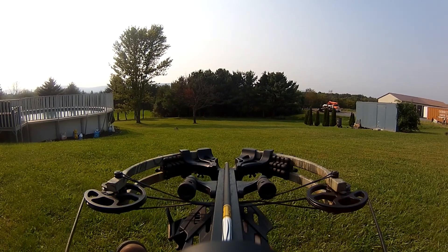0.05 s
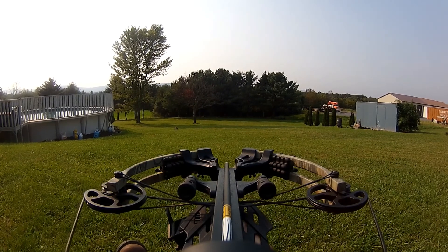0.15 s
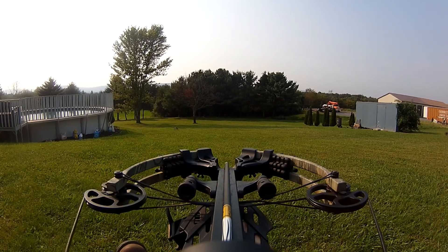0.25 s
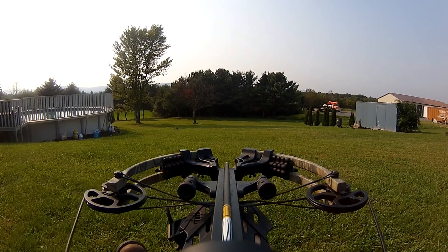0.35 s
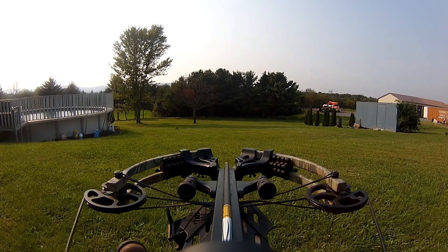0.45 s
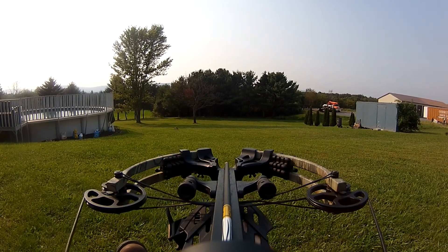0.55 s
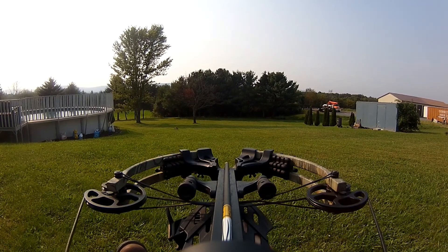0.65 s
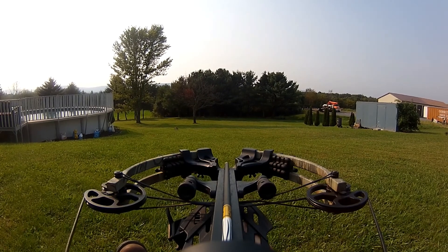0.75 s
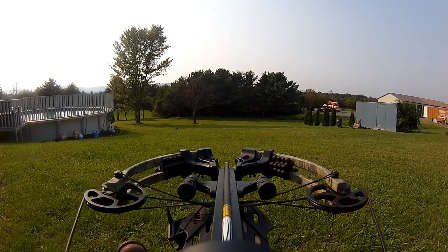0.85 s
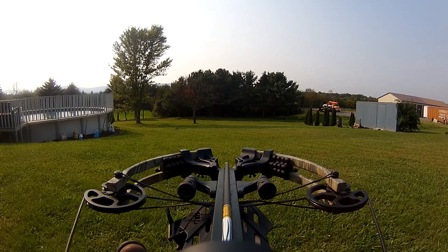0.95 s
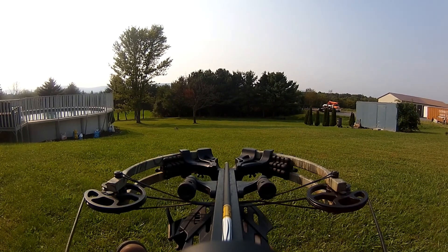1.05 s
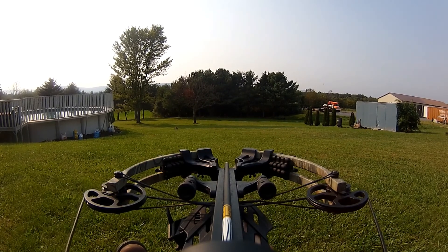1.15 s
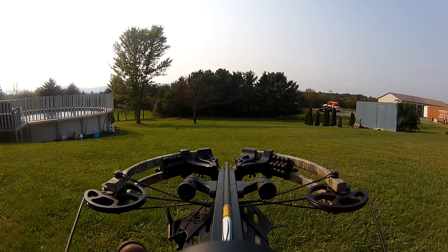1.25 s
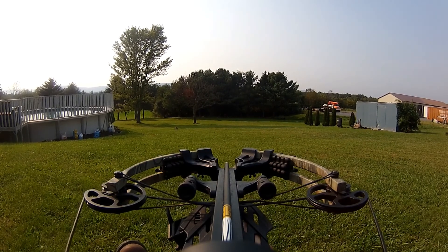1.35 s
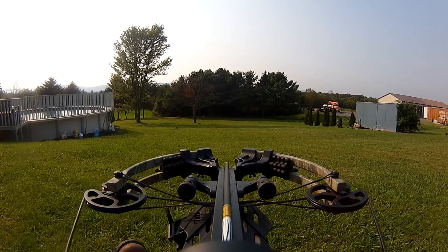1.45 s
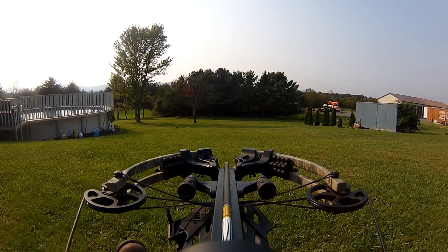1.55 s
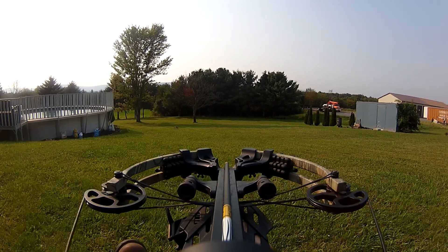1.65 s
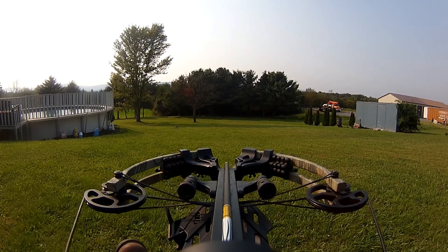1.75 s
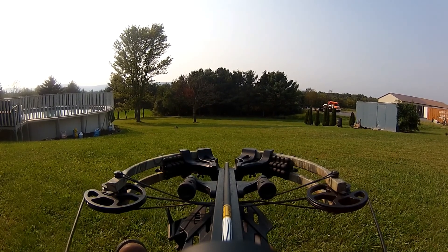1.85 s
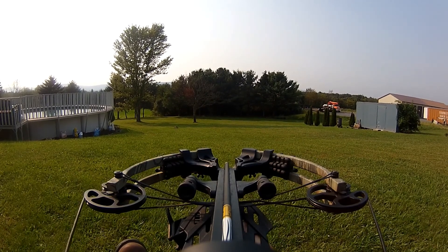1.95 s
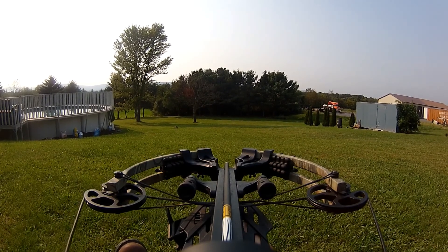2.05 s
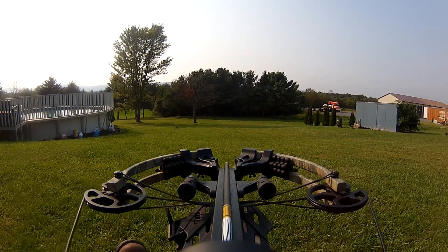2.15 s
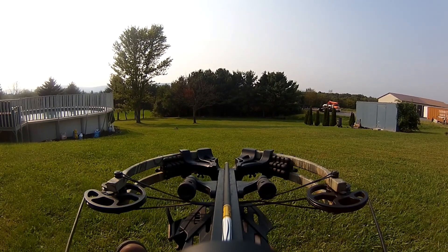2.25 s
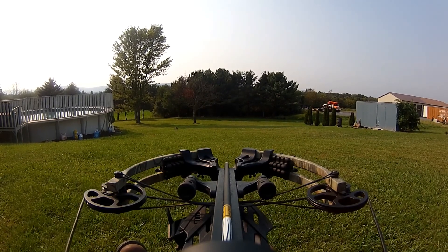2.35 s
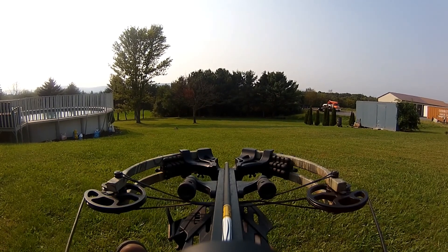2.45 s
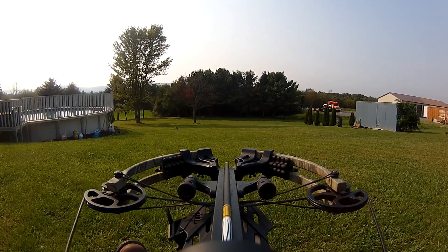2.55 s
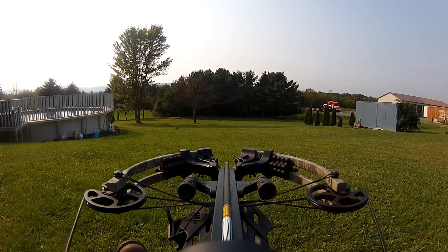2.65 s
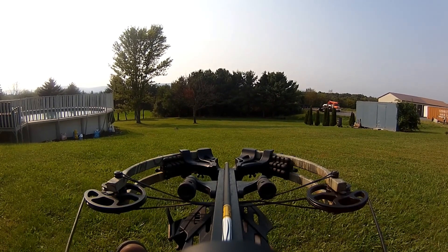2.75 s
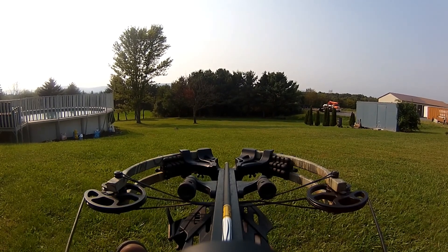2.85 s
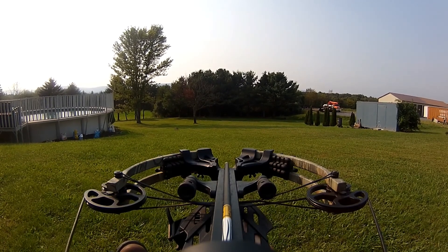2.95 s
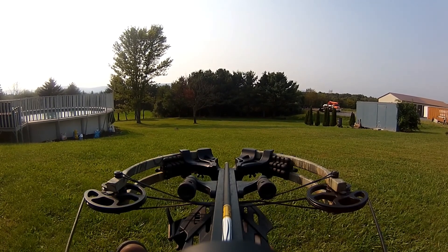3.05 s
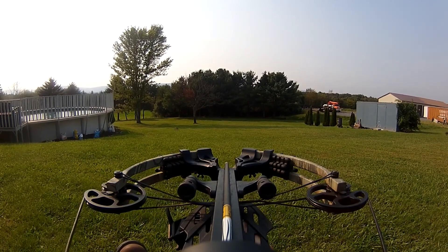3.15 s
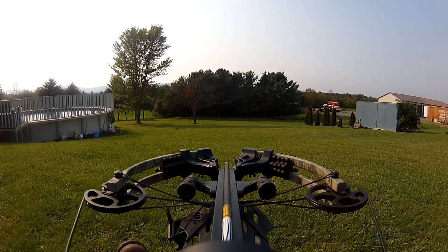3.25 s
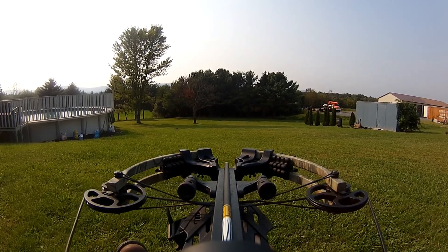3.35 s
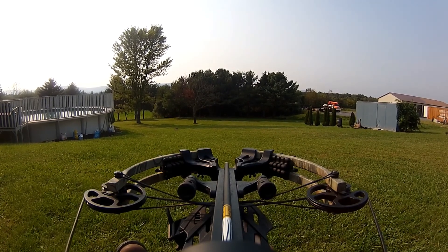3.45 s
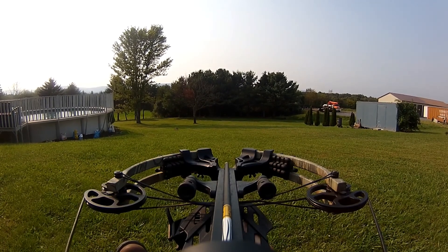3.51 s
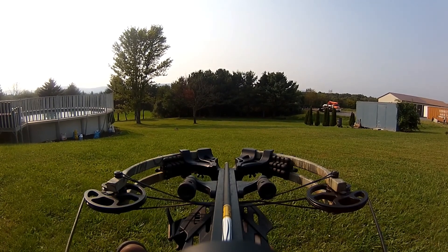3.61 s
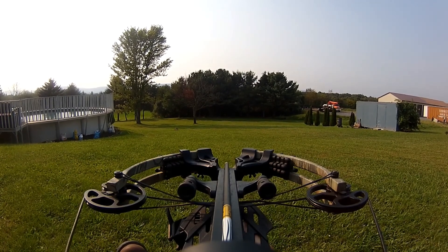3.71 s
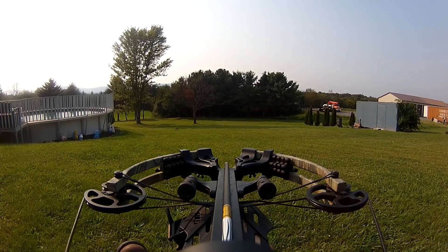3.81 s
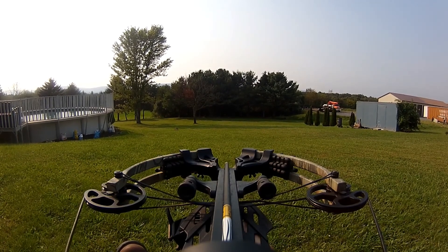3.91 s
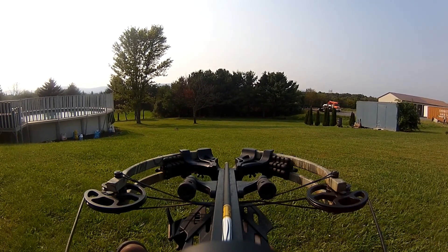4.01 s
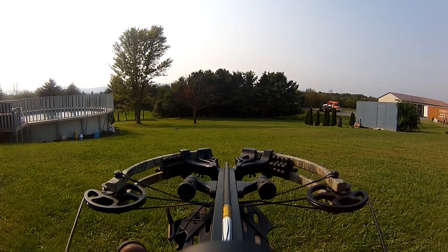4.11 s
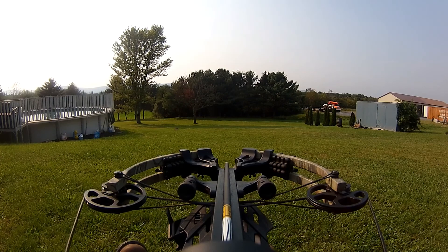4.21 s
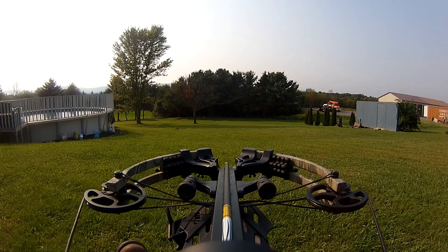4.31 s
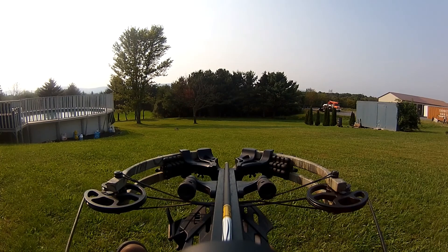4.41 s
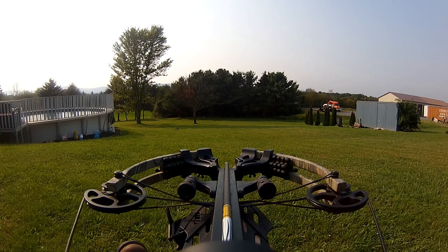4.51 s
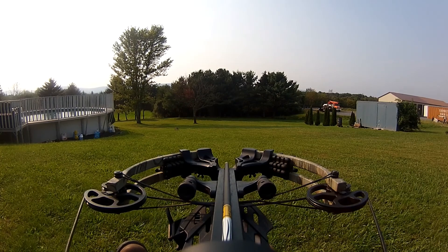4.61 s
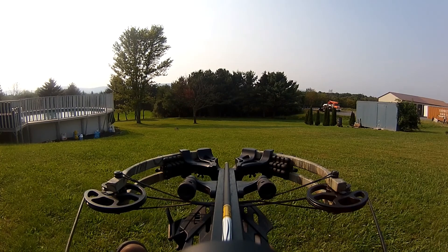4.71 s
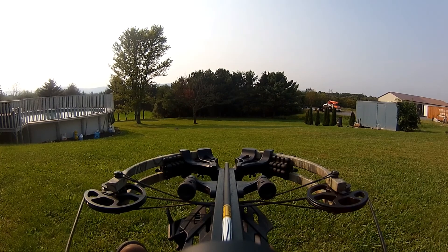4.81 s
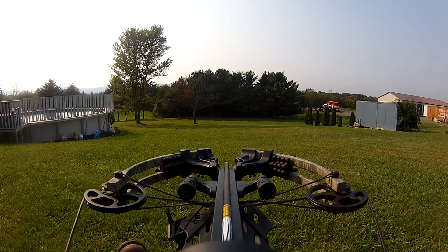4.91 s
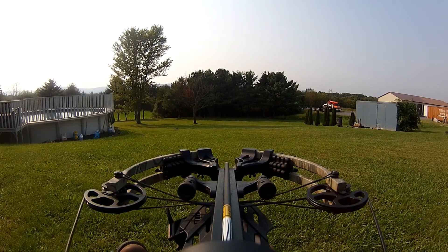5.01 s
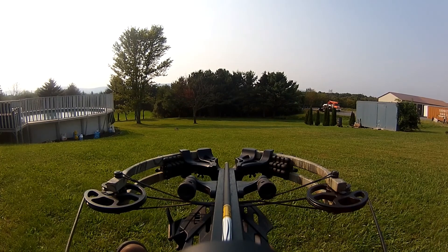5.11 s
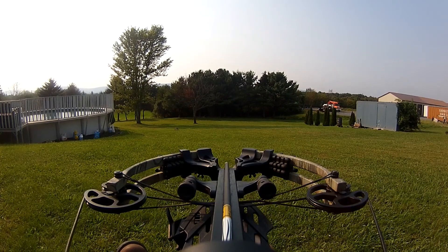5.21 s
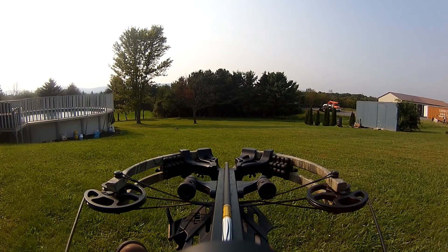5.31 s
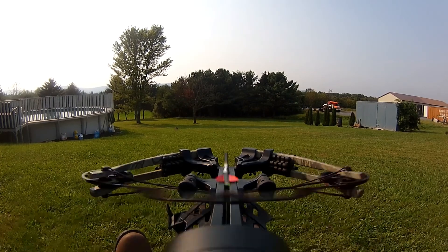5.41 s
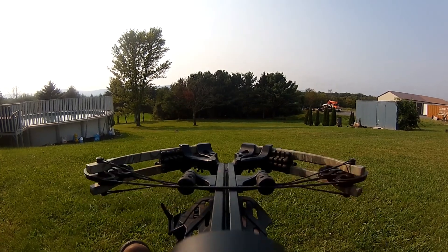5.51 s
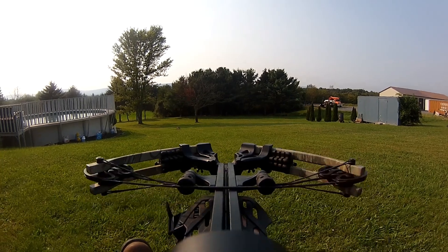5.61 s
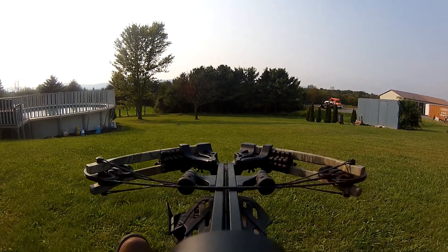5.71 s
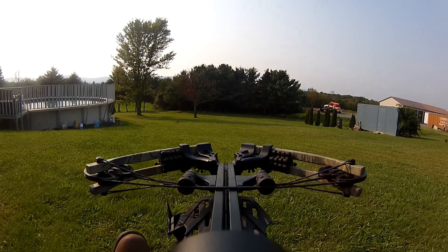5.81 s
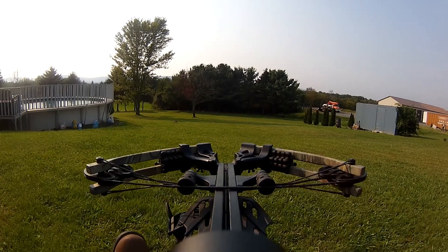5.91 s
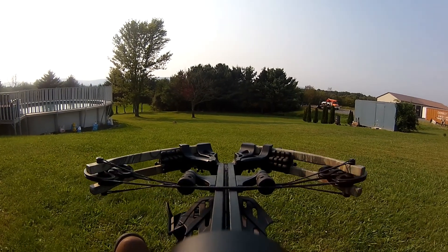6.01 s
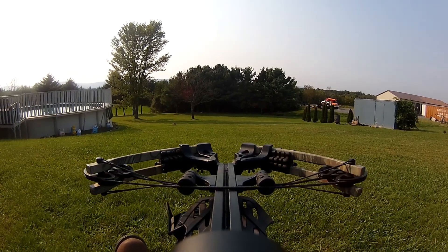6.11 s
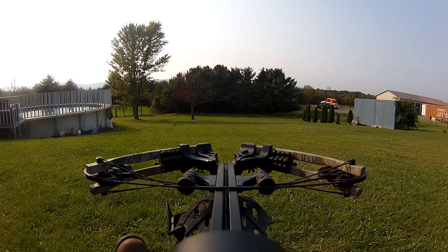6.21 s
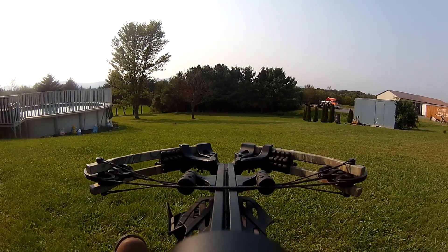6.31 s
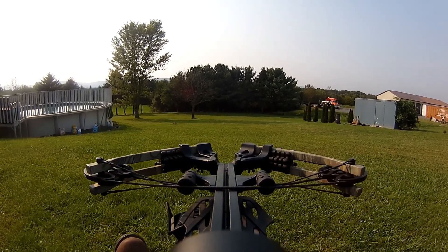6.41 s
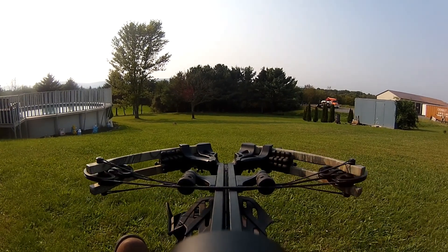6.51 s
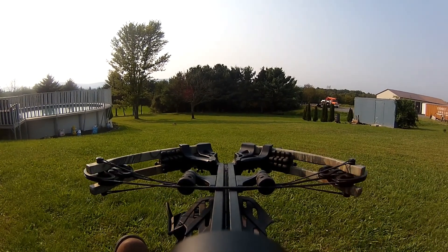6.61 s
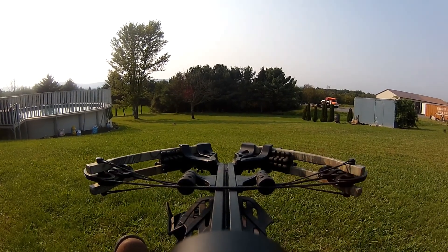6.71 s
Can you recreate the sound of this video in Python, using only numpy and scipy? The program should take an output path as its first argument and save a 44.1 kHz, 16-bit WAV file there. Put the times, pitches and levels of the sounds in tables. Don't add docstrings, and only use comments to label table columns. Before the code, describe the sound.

A small camera mounted on the crossbow hears a quiet yard: thin pulsing crickets, a brief distant bird and irregular low wind thuds. Then a tiny trigger click leads instantly into one huge, gritty, clipped crack, with string slap, ticking parts and a frame ring dying quickly. The background dips and returns, a weak far-off impact follows, and crickets and wind continue. The sound is gritty and lo-fi.

```python
import sys
import numpy as np
from scipy import signal
from scipy.fft import rfft, irfft
from scipy.io import wavfile
from scipy.ndimage import uniform_filter1d

SR = 44100
rng = np.random.default_rng(int(sys.argv[2]) if len(sys.argv) > 2 else 0)


def to_wav(s):
    ch = np.atleast_2d(s).T
    pcm = np.round(np.clip(ch, -1, 1) * 32767)
    wavfile.write(sys.argv[1], SR, pcm.astype(np.int16))


def voltage_ratio(level):
    return 10 ** (np.asarray(level, float) / 20)


N = 298116


def crossbow(stop_s=5.4065, limb_hz=106.9):
    # t/s, peak
    # level/dB, f/Hz, t60/s
    knocks = [(5.3746, -31.5, 2100, 0.0233), (5.3742, -31, 4400, 0.018), (5.3962, -2, 1480, 0.008),
              (5.3966, 0.3, 4900, .012), (5.4009, -1.5, 1900, 0.012), (5.399, -17, 67, 0.13),
              (5.404, -3, 215, 0.061), (5.401, -9, 110, .08), (5.4064, 8, 580, .018),
              (5.4082, 1.5, 700, 0.014), (5.4093, 6.5, 4480, .012), (5.4418, 3.5, 3970, 0.005),
              (5.4769, -7, 4994, .006), (5.505, -15, 5150, .006), (5.5101, -15, 3900, 0.008),
              (5.5605, -38.5, 4000, 0.0078), (5.569, -37.5, 4000, 0.0076), (5.584, -43, 4200, 0.011),
              (5.5957, -36, 2800, .012), (5.5962, -35, 1710, 0.016)]
    # f/Hz, level/dB, t60/s, swell/s while loose cables still damp them
    modes = [(107.6, 2, .33, 0.09), (150.7, -20, 0.55, .05), (212, -13, 0.3, .02), (331.5, -3, 0.24, 0.027),
             (410.8, -8, 0.66, 0.13), (820, -51.5, 1.1, .08), (917.4, -39.5, 1.49, .07),
             (1440, -43, 1.4, .055), (1786, -50.5, 1.1, .1), (2290, -39.5, 1.45, .06)]
    # first t/s, level/dB, f/Hz, fade/dB per tick, ticks
    rattles = [(5.482, 3.5, 3900, -2.5, 3), (5.5138, -10.5, 5020, -3, 4)]
    tick_t60_s = 0.0066
    out = np.zeros(N)
    ticks = []
    for s, db, hz, fade_db, count in rattles:
        ticks += [(s + k / limb_hz, db + k * fade_db, hz, tick_t60_s) for k in range(round(count))]
    for s, db, hz, t60 in knocks + ticks:
        knock = ring(db, hz, t60)
        age = np.arange(len(knock)) / len(knock)
        grit = 0.5 * rng.standard_normal(len(knock)) * voltage_ratio(db - 18 * age)
        onset = np.minimum(age / 0.07, 1)
        add(out, s, onset * (knock + grit * min(hz / 3000, 1)))
    for hz, db, t60, swell_s in modes:
        tone = ring(db, hz, t60)
        t = np.arange(len(tone)) / SR
        add(out, stop_s, tone * (1 - np.exp(-(t / swell_s) ** 4.5)))
    rush_gain, slap_gain = cables()
    swing = ((np.arange(N) / SR - stop_s) * limb_hz * 2 + 0.13 * walk(150)) % 1
    rush = level(band(rng.standard_normal(N), 4200, 5500) * voltage_ratio(1.7 * walk(700)), 0)
    pulse = 0.2 + np.exp(-swing / 0.2)
    blows = band(rng.standard_normal(N) * pulse * voltage_ratio(3.5 * walk(200)), 730, 1300)
    slap = 0.7 * band(blows, 540, 450) + 0.59 * band(blows, 1150, 450) + 0.7 * band(blows, 1950, 500)
    return out + rush_gain * rush + slap_gain * level(slap, 0)


def cables():
    lead_in_s, release_s, stopped_s, slack_s = 5.3925, 5.3963, 5.412, 5.504
    lead_in_db, rush_db, run_db = -40.5, -6.5, -13.5
    t = np.arange(N) / SR
    after = np.maximum(t - stopped_s, 0)
    running = (t > release_s) & (t <= stopped_s)
    leading_in = (t > lead_in_s) & (t <= release_s)
    hiss = voltage_ratio(1.5 - 620 * after) + voltage_ratio(-24 - 175 * after)
    slack_db = -13.5 * np.clip((t - slack_s) / 0.0045, 0, 1) - 90 * np.maximum(t - slack_s, 0)
    slap = voltage_ratio(-4 - 150 * after + slack_db)
    rush_gain = voltage_ratio(lead_in_db) * leading_in + voltage_ratio(rush_db) * running + hiss * (after > 0)
    return rush_gain, voltage_ratio(run_db) * running + slap * (after > 0)


def target():
    strike_s, crack_db, thud_db, echo_db, echo_t60 = 6.0768, -28.5, -33.5, -50, 0.44
    out, t = np.zeros(N), np.arange(int(echo_t60 * SR)) / SR
    # f/Hz, level/dB, t60/s
    for hz, mode_db, t60 in ((1810, 2, 0.006), (4900, -3, 0.004), (3230, -6, 0.003), (2500, -9, 0.003),
                             (800, -13, 0.008)):
        add(out, strike_s + 0.00018, -ring(crack_db + mode_db, hz, t60))
    add(out, strike_s + 0.00084, ring(thud_db, 285.7, 0.051))
    scatter = band(rng.standard_normal(len(t)), 2600, 5000) * voltage_ratio(1.12 * walk(303)[:len(t)])
    late = voltage_ratio(echo_db - 60 * t / echo_t60)
    early = voltage_ratio(echo_db + 9.5 - 60 * t / 0.027)
    add(out, strike_s, 2 * scatter * (late + early))
    return out


def wind():
    # t/s, strength/dB
    breeze = [(0.0, -52), (0.9, -59.5), (1.5, -47.5), (2.1, -45), (2.55, -38.5), (2.85, -45.5),
              (3.25, -41.5), (3.42, -57), (3.72, -41.5), (4.0, -47.5), (4.35, -46), (4.75, -49.5),
              (4.95, -51), (5.35, -41), (5.7, -42), (5.9, -40), (6.3, -49.5), (6.76, -61)]
    # middle t/s, length/s, strength/dB
    gusts = [(0.776, 0.08, -47.5), (1.277, 0.064, -47), (1.63, .1, -56), (1.895, 0.15, -38.5),
             (1.996, 0.096, -42.5), (2.26, 0.12, -42.5), (2.722, 0.14, -32), (2.962, 0.12, -42.5),
             (3.082, 0.11, -34), (3.52, .1, -32), (3.628, 0.064, -39), (4.178, 0.21, -36),
             (4.59, 0.063, -52), (4.745, 0.16, -42), (5.05, .1, -48), (5.766, 0.039, -36), (5.84, .12, -44),
             (5.984, .08, -41.5), (6.103, 0.041, -42), (6.24, .1, -51)]
    # t/s, peak level/dB, f/Hz, push 1 or pull -1
    eddies = [(2.0, -28, 168.4, -1), (2.266, -30, 95, -1), (2.289, -36, 70, 1), (2.551, -29, 130, 1),
              (2.618, -32, 95, -1), (2.695, -22.5, 167, 1), (2.746, -19, 170, -1), (2.772, -33, 130, -1),
              (2.966, -25, 95, 1), (3.019, -34.5, 220, -1), (3.038, -34, 170, -1), (3.079, -22.5, 221, 1),
              (3.098, -28, 129.7, 1), (3.192, -32, 95, 1), (3.515, -26.5, 170, 1), (3.543, -23, 163, 1),
              (3.732, -31, 130.2, 1), (4.141, -33, 220, -1), (4.165, -23, 170, 1), (4.198, -22.5, 171, 1),
              (4.237, -25.5, 95, -1), (4.659, -32.5, 168, -1), (4.736, -36, 169, 1), (4.824, -28.5, 95, 1),
              (5.763, -29, 260, 1), (5.77, -22.5, 81, -1), (5.879, -26, 200, 1), (5.928, -27.5, 95, 1),
              (5.981, -33, 70.1, -1)]
    t = np.arange(N) / SR
    force = voltage_ratio(curve(breeze)[0])
    for s, length_s, db in gusts:
        force = force + voltage_ratio(db) * np.exp(-(3 * (t - s) / length_s) ** 2)
    lumps = walk(35)
    relative = force / voltage_ratio(-40)
    out = force * level(steep(17.3, 80) * voltage_ratio(1.6 * walk(14)), -0.094)
    out += voltage_ratio(-45) * relative ** 1.3 * level(steep(80, 160) * voltage_ratio(1.7 * lumps), -4.5)
    out += voltage_ratio(-55.5) * relative ** 1.7 * level(steep(140, 310) * voltage_ratio(4.8 * lumps), -8)
    for s, db, listed_hz, push in eddies:
        hz = 0.73 * listed_hz
        u = (np.pi * np.linspace(-1, 1, int(2 * SR / hz))) ** 2
        kick = (1 - 2 * u) * np.exp(-u)
        add(out, s - 1 / hz, np.sign(push) * voltage_ratio(db) * kick)
    return out


def bird():
    # t/s, f/Hz, level of the fourth partial/dB
    notes_sung = [(0.05, 741.3, -65), (0.086, 776.2, -58), (0.146, 782, -54), (0.234, 749, -65.5),
                  (0.264, 755, -67), (0.288, 720, -71), (0.31, 749.4, -74)]
    # levels of partials 3, 5, 6, 7 against the fourth/dB, rasp level/dB
    throat = [
        (-11, -15, -5, -10, -20),
        (-7, 0.5, -3, -11, 2),
    ]
    closes_s, closing_s = 0.205, 0.03
    first, last = notes_sung[0], notes_sung[-1]
    silent_ends = [(first[0] - 0.01, first[1], -95)], [(last[0] + 0.01, last[1], -95)]
    hz, db = curve(silent_ends[0] + notes_sung + silent_ends[1])
    third_db, fifth_db, sixth_db, seventh_db, rasp_db = curve(
        [(closes_s, *throat[0]), (closes_s + closing_s, *throat[1])])
    rough = np.interp(np.arange(N) / SR, [0.19, 0.25], [0.003, 0.012])
    phase = 2 * np.pi * np.cumsum(hz * (1 + rough * walk(130))) / SR
    stack = np.zeros(N)
    for k, partial_db in zip(range(3, 8), (third_db, 0, fifth_db, sixth_db, seventh_db)):
        stack += voltage_ratio(partial_db + 2.8 * walk(60)) * np.sin(k * phase)
    rasp = level(steep(3700, 4030), 0) + level(steep(4250, 4800), -4)
    call = voltage_ratio(db - 2.2) * stack + voltage_ratio(db + rasp_db) * rasp
    return call + voltage_ratio(-19.5) * np.roll(call, int(0.29 * SR))


def crickets(fall_hz=650, stroke_s=0.032, gain_db=2.4, stroke_rate=21):
    # first stroke t/s, peak level/dB
    chirps = [(0.392, -65.5), (0.683, -65.5), (0.983, -65.5), (1.288, -62.5), (1.597, -67), (1.968, -67),
              (2.391, -65.5), (2.684, -66), (3.084, -67.5), (3.465, -70), (3.75, -67), (4.211, -68),
              (4.505, -68), (4.779, -69.5), (5.063, -67.5), (5.609, -65), (5.888, -62), (6.174, -62),
              (6.476, -62.5)]
    stroke_db = (1, 2.5, 1.3)
    start_hz = (4700, 4700, 4800)
    # f/Hz, bandwidth/Hz, level/dB, chirps per s
    choirs = [(4130, 150, -78.5, 2.6), (4400, 350, -75, 3.1), (4636, 150, -79, 2.8),
              (5056, 210, -80.5, 2.9)]
    stroke_gap_s = 0.046
    out, t = np.zeros(N), np.arange(int(stroke_s * SR)) / SR
    envelope = np.hanning(len(t)) ** 0.49
    for s, db in chirps:
        for k, top_hz in enumerate(start_hz):
            detune, phase, effort = rng.standard_normal(3)
            hz = top_hz + 30 * detune - fall_hz * (t / stroke_s) ** 1.3
            tone = envelope * np.sin(2 * np.pi * np.cumsum(hz) / SR + 3 * phase)
            gain = voltage_ratio(db + stroke_db[k] + gain_db + 1.5 * effort)
            add(out, s + k * stroke_gap_s - 0.39 * stroke_s, gain * tone)
    haze = voltage_ratio(-30) * rng.standard_normal(4000) * np.exp(-np.arange(4000) / 1300)
    out += signal.fftconvolve(out, haze)[:N]
    for hz, width_hz, db, rate in choirs:
        chirp = np.sin(2 * np.pi * np.cumsum(rate * (1 + 0.11 * walk(1.5))) / SR + 6 * rng.random())
        stroke = np.sin(2 * np.pi * np.cumsum(stroke_rate * (1 + 0.062 * walk(4.6))) / SR)
        choir = band(band(rng.standard_normal(N), hz, width_hz), hz, width_hz)
        out += level(choir * voltage_ratio(3.7 * chirp + 4 * stroke), db)
    return out


def field():
    # f/Hz, level/dB per Hz
    spectrum = [(25, 7), (70, 4), (150, -1), (300, -8.5), (600, -12.5), (1200, -17.5), (2800, -24),
                (6500, -28.5)]
    bend_hz, bend_db = np.transpose(spectrum)
    hz = np.fft.rfftfreq(N, 1 / SR) + 1
    colour = voltage_ratio(np.interp(np.log(hz), np.log(bend_hz), bend_db))
    hiss = irfft(rfft(rng.standard_normal(N)) * colour, N)
    return level(hiss * voltage_ratio(0.57 * walk(5.6)), -50.5)


def ring(db, hz, t60):
    t = np.arange(int(t60 * SR)) / SR
    return voltage_ratio(db - 60 * t / t60) * np.sin(2 * np.pi * hz * t)


def band(x, hz, width):
    return signal.lfilter(*signal.iirpeak(hz, hz / width, fs=SR), x)


def steep(lo_hz, hi_hz):
    edges = signal.butter(3, [lo_hz, hi_hz], "band", fs=SR, output="sos")
    return signal.sosfilt(edges, rng.standard_normal(N))


def level(x, db):
    return x * voltage_ratio(db) / np.sqrt(np.mean(x ** 2))


def curve(rows):
    s, *columns = np.transpose(rows)
    return [np.interp(np.arange(N) / SR, s, c) for c in columns]


def walk(rate):
    k = int(SR / rate)
    held = np.repeat(rng.standard_normal(N // k + 1), k)
    return 1.3 * uniform_filter1d(uniform_filter1d(held, k), k)[:N]


def add(out, s, sound):
    i = int(s * SR)
    out[i:i + len(sound)] += sound[:N - i]


def scene():
    return (crossbow() + target() + wind() + bird() + crickets() + field())[None]


def ducking():
    duck_s, snap_s, sink_s = 5.4115, 0.002, 0.022
    snap_db, duck_db, climb_db_s = -22.5, -34.5, 175.5
    bottom_s = duck_s + sink_s
    return voltage_ratio(curve([(duck_s, 0), (duck_s + snap_s, snap_db), (bottom_s, duck_db),
                      (bottom_s - duck_db / climb_db_s, 0)])[0])


def roll_off(x):
    return signal.sosfilt(signal.butter(12, 16520, fs=SR, output="sos"), x)


def record(dry):
    ceiling = 0.73
    edge = signal.butter(3, 5750, fs=SR, output="sos")
    ducked = signal.sosfilt(edge, dry * ducking())
    notched = signal.lfilter(*signal.iirnotch(6000, 15, fs=SR), ducked)
    hot = signal.resample_poly(notched, 40, 147, axis=1) / ceiling
    slow = ceiling * hot / (1 + np.abs(hot) ** 4) ** 0.25
    held = signal.resample_poly(np.repeat(slow, 4, axis=1), 147, 160, axis=1)[:, 1:N + 1]
    held = np.pad(held, ((0, 0), (0, N - held.shape[1])))
    top = signal.ellip(9, 0.2, 34, 15250, fs=SR, output="sos")
    return roll_off(signal.sosfilt(top, held))


dry = scene()
out = record(dry)
to_wav(out)
```